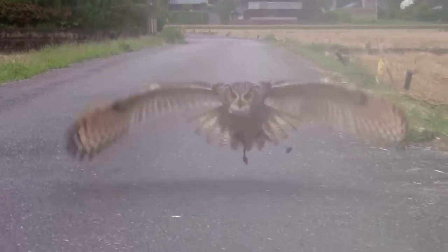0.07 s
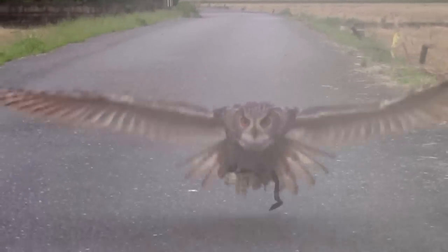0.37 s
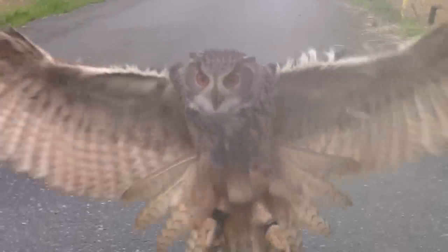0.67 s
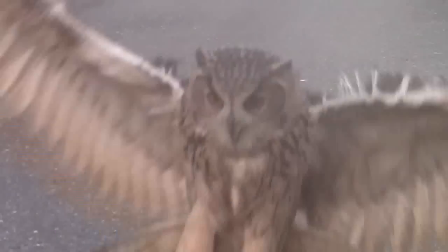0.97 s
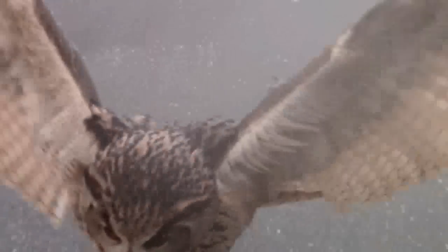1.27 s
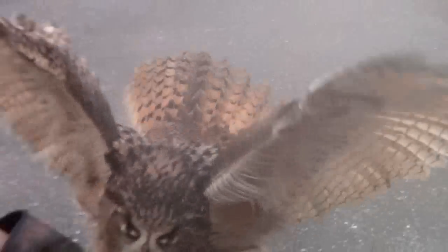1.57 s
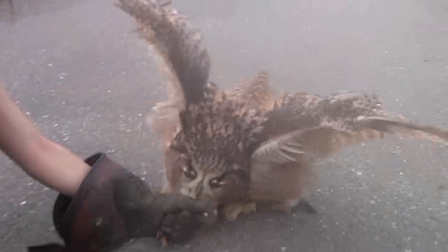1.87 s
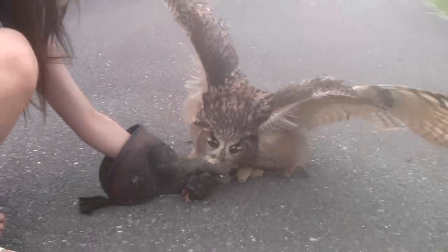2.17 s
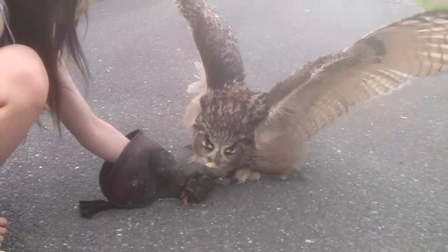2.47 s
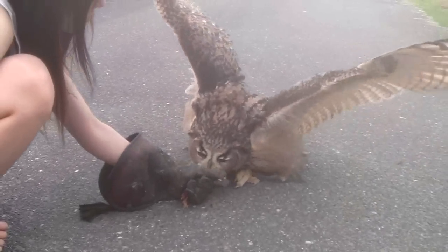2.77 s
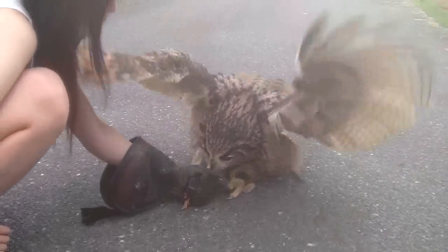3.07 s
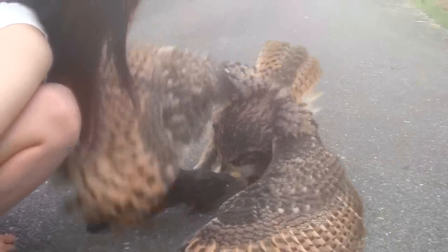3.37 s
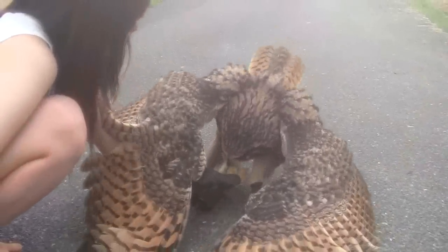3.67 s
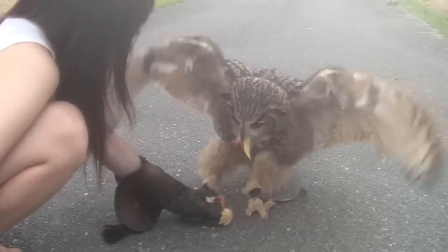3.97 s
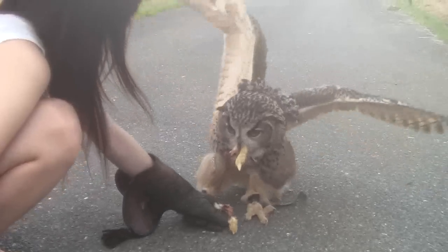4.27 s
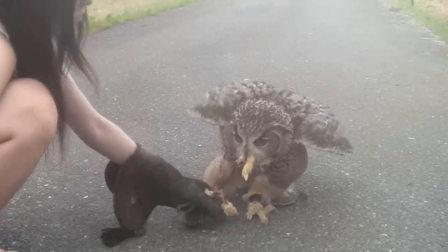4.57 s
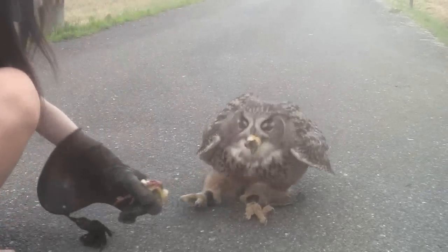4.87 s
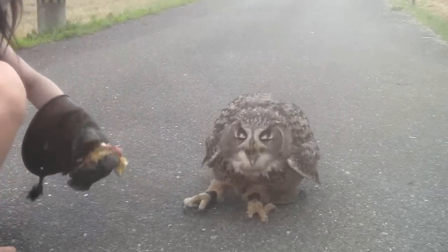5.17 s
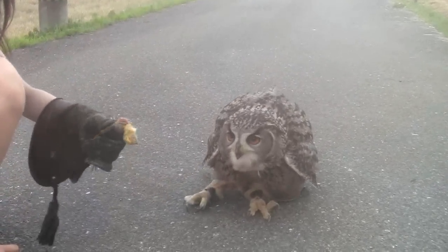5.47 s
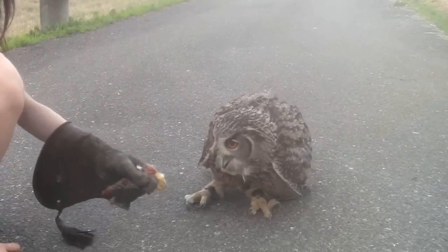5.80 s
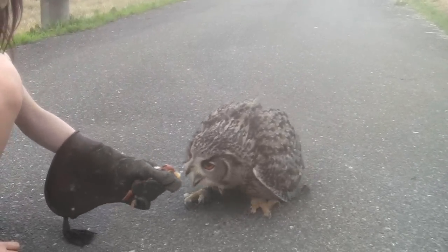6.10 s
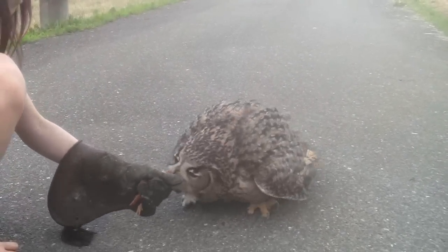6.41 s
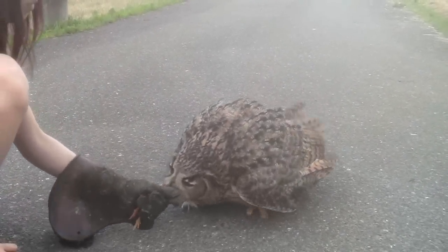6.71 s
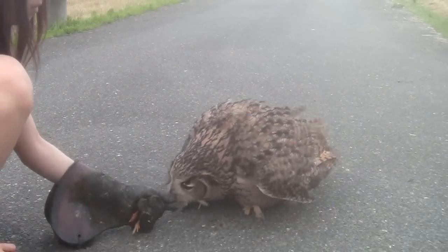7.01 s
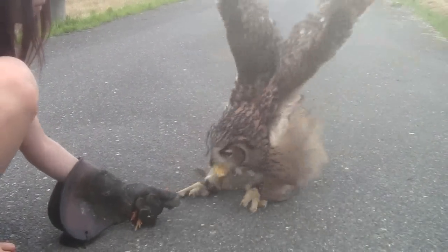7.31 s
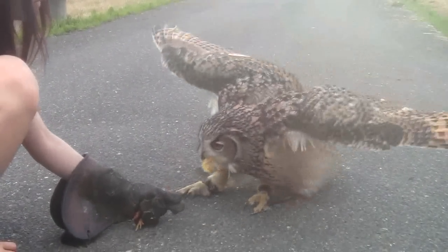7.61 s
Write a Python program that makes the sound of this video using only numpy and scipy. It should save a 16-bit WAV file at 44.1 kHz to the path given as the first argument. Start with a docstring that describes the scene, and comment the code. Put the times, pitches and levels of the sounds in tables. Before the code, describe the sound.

An owl is heard close up outdoors, over a faint, steady distant rumble and hum. It opens with a soft feather rustle, a small chirp and a dull bump. Just before 1 second the beak snaps, and a harsh, hissing scream follows, stuttering out by 1.5 seconds. A second, shorter scream comes at 2 seconds, trailed by a brief hissy echo. Soft knocks and low wing puffs continue to about 3.5 seconds. From 3 to 4 seconds the owl chitters in rapid, high, raspy downward swoops, with a cleaner run from 4.5 to 5 seconds. A third scream arrives around 5.8 seconds. Thin, wavering whines start at 6.6 seconds and mix into more chitter until about 7.6 seconds, with light rustling underneath. Single chirps, dry talon ticks and muffled handling bumps are scattered between the calls.

```python
"""An eagle owl lands on a country road and squabbles over food on a handler's glove, close by.
Feathers rustle, the beak snaps, and turbulent air rings its throat in two hissing screams,
the second trailed by a brief hissy echo. Wings push air at the microphone, then the owl's membranes
whistle runs of swooping chitter, rough when low. A third scream leads to thin whines and more chitter.
Single chirps, dull knocks and talon ticks are scattered throughout, over a distant hum."""
import sys
import numpy as np
from scipy import signal
from scipy.fft import rfft, irfft, next_fast_len
from scipy.io import wavfile
from scipy.ndimage import uniform_filter1d, map_coordinates

SR = 44100
rng = np.random.default_rng(int(sys.argv[2]) if len(sys.argv) > 2 else 0)


def wav_out(sig):
    """Save sig, one row per channel (or a flat mono array), as 16-bit PCM at SR to the path in sys.argv[1]."""
    wavfile.write(sys.argv[1], SR, np.round(np.clip(np.atleast_2d(sig).T, -1, 1) * 32767).astype(np.int16))


N = 337365

# spectrum shared by the feather rustles, the hissy echo and the beak's click: freq_hz, gain_db
DRY_HISS_COLOUR = [(500, 6), (1500, -2.5), (4000, 4.5), (6500, 2), (9000, 4.5), (11000, -5), (13000, -3)]


def screams(split_hz=6500):
    """Three harsh screams whose treble shifts with effort; the first and last break into stutters."""
    # effort curve of each scream: time_s, level_db, treble_db
    efforts = [
        [(0.99, -47, -15), (1.03, -24.5, -4), (1.102, -13.5, -9), (1.232, -13.5, -8.5), (1.318, -27, -10),
         (1.328, -17.5, -14), (1.358, -20.5, -16), (1.402, -16.5, -8), (1.435, -31, -14)],
        [(1.997, -25, -24), (2.001, -17.5, -24), (2.053, -15.5, -22), (2.079, -15, -8.5), (2.251, -14.5, -10.5),
         (2.256, -12, -4)],
        [(5.795, -30.5, -18), (5.813, -22, -11), (5.881, -13.5, -19), (5.935, -12, -15), (6.043, -18, -13),
         (6.052, -19, -10)],
    ]
    # throat resonances of each scream: centre_hz, width_hz, level_db
    throats = [
        [(554, 164, -19.5), (1966, 1160, -13.5), (2850, 780, -8.5), (3380, 580, -7), (3713, 460, 0.5),
         (4430, 600, -10.5), (5110, 1120, -7), (6700, 1100, -12.5), (8270, 1550, -16), (9170, 2300, -23),
         (10900, 2600, -29.5)],
        [(606, 560, -23), (1490, 930, -17.5), (2456, 350, -3), (3860, 1700, 2), (4620, 2100, 1.5),
         (6100, 900, -14), (8300, 3600, -14.5), (10500, 1200, -44)],
        [(593, 250, -21.5), (1480, 470, -14), (2070, 760, -2), (2810, 1160, -3.5), (4100, 970, 0.5),
         (4850, 390, -5), (6130, 2300, -7), (7900, 1800, -13.5), (9400, 2300, -15.5), (11000, 3900, -25)],
    ]
    # the opening beak slides those resonances up: start_factor, end_factor
    gapes = [(0.99, 1.09), (0.94, 1.02), (.94, 1.06)]
    # short bursts of rasp: start_s, length_s, level_db
    stutters = [(1.32, 0.011, -20), (1.451, 0.015, -26), (1.466, 0.047, -27.5), (1.49, 0.014, -17),
                (6.051, 0.026, -30.5), (6.077, 0.015, -34), (6.105, 0.0031, -25), (6.114, 0.056, -40)]
    out = np.zeros(N)
    low_pass = signal.butter(4, split_hz, fs=SR, output="sos")
    for curve, throat, gape in zip(efforts, throats, gapes):
        s, db, treble_db = np.transpose(curve)
        t = np.arange(s[0], s[-1], 1 / SR)
        breath = throat_rasp(throat, np.linspace(*gape, len(t)))
        body = signal.sosfiltfilt(low_pass, breath)
        voice = unit(body) + amp(np.interp(t, s, treble_db)) * unit(breath - body)
        add(out, s[0], voice * amp(np.interp(t, s, db)) * fade(t, 0.003))
    for s, length, db in stutters:
        t = seconds(length)
        # the throat stays as the last scream left it
        last = sum(curve[0][0] < s for curve in efforts) - 1
        held_gape = np.full(len(t), gapes[last][1])
        add(out, s, amp(db) * fade(t, 0.0025) * throat_rasp(throats[last], held_gape))
    return out


def throat_rasp(throat, gape, pulse_hz=260, depth=0.16, rough_db=0.66):
    """Turbulent air, chopped by uneven pulses, rings the throat; the gape scales every resonance."""
    size, loop_size = len(gape), 32768
    f = np.fft.rfftfreq(loop_size, 1 / SR)
    power = sum(amp(db) ** 2 / (1 + 2 * ((f - hz) / width) ** 2) ** 5 for hz, width, db in throat)
    loop = irfft(rfft(rng.standard_normal(loop_size)) * np.sqrt(power))
    ring = map_coordinates(loop, [np.cumsum(gape)], order=3, mode="wrap")  # gape sets the loop's speed
    pulse = phase_of(pulse_hz * (1 + 0.37 * walk(250, size)))
    return unit(ring * (1 + depth * np.cos(pulse)) * amp(rough_db * walk(220, size)))


def chitter(thin_db_per_octave=15.5, smooth_octaves=0.27, turn_fade_db=7.5):
    """Swoops slide to a knee, plunge to a trough and turn up; a deeper plunge thins the voice more."""
    # one swoop a row: start_s, fall_ms, top_hz, trough_hz, knee_db, trough_db, rasp (0-1)
    swoops = [(3.162, 47.5, 4720, 2170, -29, -29, 0.54), (3.25, 27, 4780, 2600, -38, -27, 0.98),
              (3.314, 28.5, 6430, 2830, -34, -23, 1), (3.395, 21, 7000, 2690, -32, -22.5, 1),
              (3.463, 29, 7630, 2600, -21, -25.5, 1), (3.541, 21, 7600, 2700, -19, -17, 0.94),
              (3.612, 24, 7760, 2730, -19.5, -19, 0.85), (3.688, 17, 4700, 2670, -23, -26.5, 0.87),
              (3.761, 19.3, 7650, 2790, -9.5, -20, 0.81), (3.838, 17, 7870, 2650, -8, -20, 0.82),
              (3.914, 23, 7960, 3030, -16, -23, .94), (3.982, 29, 7570, 2700, -16, -16.5, 1),
              (4.512, 34, 5000, 2380, -30, -30.5, 0.66), (4.597, 37, 5050, 1940, -26, -25, 0.58),
              (4.693, 32, 5100, 3440, -15, -34, 0.3), (4.785, 30.5, 5160, 3870, -23.5, -23.5, 0),
              (4.862, 42, 5150, 3290, -21.5, -23, 0.13), (6.876, 11.3, 4720, 2600, -22, -31.5, .25),
              (6.923, 38.5, 5150, 2670, -15.5, -24, 0), (6.998, 22, 4940, 3410, -14, -19.5, 0),
              (7.151, 15.4, 4410, 2440, -32, -27.5, 0.94), (7.192, 45, 6050, 2720, -22.5, -34, 0.66),
              (7.272, 32, 6260, 2700, -23, -32, 0.54), (7.343, 28, 6380, 2680, -23, -30.5, 0.83),
              (7.411, 36, 6210, 2910, -27, -27.5, 0.85), (7.491, 48, 6200, 3150, -23.5, -29.5, 0.4),
              (7.572, 43.4, 5950, 4230, -24.5, -22, 0)]
    # the manner of each bout: from_s, knee_share (of the fall), knee_ratio (to the top pitch),
    # turn_ms, end_hz, swell_db, octave_db, hiss_db, flutter (0-1)
    bouts = [(3.1, 0.51, 0.83, 27.4, 3420, 16, -12, -35, .3),
             (3.45, 0.55, 0.86, 28, 3280, 11.5, -32, -39, 0.2),
             (4.45, .55, .77, 21, 4810, 18, -12, -40.5, 1),
             (6.8, 0.73, 0.72, 23.4, 5140, 10, -15, -50, 0.4)]
    out = np.zeros(N)
    for s, fall_ms, top_hz, trough_hz, knee_db, trough_db, rasp in swoops:
        bout = [row for row in bouts if row[0] <= s][-1]
        _, knee_share, knee_ratio, turn_ms, end_hz, swell_db, octave_db, hiss_db, flutter = bout
        knee_ms, end_ms = fall_ms * knee_share, fall_ms + turn_ms
        ms = np.arange(0, end_ms, 1000 / SR)
        hz = np.interp(ms, [0, knee_ms, fall_ms, end_ms],
                       [top_hz, knee_ratio * top_hz, trough_hz, end_hz])
        excess_octaves = max(np.log2(top_hz / trough_hz) - smooth_octaves, 0)
        thin_db = (knee_db + trough_db) / 2 - thin_db_per_octave * excess_octaves
        db = np.interp(ms, [0, knee_ms, (knee_ms + fall_ms) / 2, fall_ms],
                       [knee_db - swell_db, knee_db, thin_db, trough_db])
        db -= turn_fade_db * np.clip((ms - fall_ms) / turn_ms, 0, 1)
        add(out, s, syllable(hz, db, octave_db, hiss_db, rasp, flutter))
    return out


def chirps(linger=1.5, peak_share=0.46, rise_db=9.5, fall_db=16.5):
    """Single glides that swell, fade and linger at their low end."""
    # one glide a row: start_s, length_ms, start_hz, end_hz, peak_db, octave_db, rasp (0-1)
    glides = [(0.051, 56, 3110, 2040, -34, -3.5, 0.78), (0.983, 46, 1500, 2530, -36, -11, 0.7),
              (1.616, 38.6, 2640, 1896, -20, -5.5, .5), (1.982, 17.3, 5520, 3280, -11, -32, 0),
              (2.425, 22, 2410, 1900, -31, 3.5, 0.26), (2.935, 99, 1593, 2110, -42.5, 2.5, 0.4),
              (3.012, 76, 2460, 3120, -27.5, -28, 0.76), (3.085, 68, 3460, 2900, -35.5, -20, 0.5),
              (4.061, 40, 5650, 3150, -17.5, -15, .5), (4.095, 53.6, 2394, 1712, -18.5, -7.5, 0.66),
              (4.414, 66, 1876, 2695, -26.5, -19.5, 0.55), (4.944, 33, 4900, 2500, -22.5, -0.5, 0.8),
              (4.973, 40, 2064, 1580, -17.5, -17, 0.69), (5.006, 40, 566, 380, -37, -7, .1),
              (5.41, 55, 2320, 2930, -37.5, -3, 0.67), (5.64, 95, 1710, 2700, -45.5, -9, 0.57),
              (5.752, 60, 4150, 2770, -26.5, -14, 0.54), (6.201, 50, 3240, 1780, -17.5, -16, 0.63),
              (6.495, 72, 2690, 3590, -27, -26.5, 0.35)]
    out = np.zeros(N)
    for s, ms, start_hz, end_hz, peak_db, octave_db, rasp in glides:
        along = np.linspace(0, 1, int(ms * SR / 1000))
        hz = np.interp(along, [0, 1], [start_hz ** -linger, end_hz ** -linger]) ** (-1 / linger)
        db = peak_db - np.interp(along, [0, peak_share, 1], [rise_db, 0, fall_db])
        add(out, s, syllable(hz, db, octave_db, hiss_db=peak_db - 24, rasp=rasp, flutter=0.5))
    return out


def syllable(hz, db, octave_db, hiss_db, rasp, flutter, slack_hz=3400, taut_hz=4800, release_s=0.011):
    """One whistled note, clean while high and rough when low, with its puff of hiss."""
    # spectrum of the breath: freq_hz, gain_db
    hiss_colour = [(900, -8.5), (1500, -5.5), (2000, -6), (2800, -16.5), (3800, 3.5), (5200, -12.5),
                   (6500, -4.5), (7500, 0), (9200, 0.5), (10500, -9.5), (12000, -37.5)]
    t = np.arange(len(hz)) / SR
    slack = np.interp(hz, [slack_hz, taut_hz], [1, 0.076])
    unsteady_hz = hz * (1 + 0.015 * walk(140, len(t)))
    unsteady_db = db + 2 * walk(159.8, len(t))
    note = whistle(unsteady_hz, unsteady_db, octave_db, rasp ** 2 * slack, flutter,
                   flutter_hz=601, chaos=0.15, chaos_rate=1400, croak_db=-6.5)
    hiss = amp(hiss_db + 4.3 * walk(400, len(t))) * noise(hiss_colour, len(t))
    release = np.sqrt(np.clip((t[-1] - t) / release_s, 0, 1))  # the air runs out
    return release * (fade(t, 0.00094) * note + fade(t, 0.00413) * hiss)


def whistle(hz, db, octave_db, rasp, flutter, flutter_hz=370, chaos=0.17, chaos_rate=2200,
            jitter=0.0072, croak_db=-3, sub_db=-13):
    """One membrane whistles; a second makes it flutter; when slack it goes chaotic and croaks."""
    # spectrum of the croak: freq_hz, gain_db
    croak_colour = [(1700, -33), (2250, 10), (2600, 0), (3100, -5), (3900, 9.5), (4700, -35.5)]
    size = len(hz)
    hz = uniform_filter1d(hz, size=160)
    wobble = flutter * np.sin(phase_of(flutter_hz * (1 + 0.204 * walk(150, size))))
    stray = (jitter + chaos * rasp) * walk(chaos_rate, size)
    phase = phase_of(hz * (1 + stray + 0.091 * wobble))
    throb = (1 + 0.57 * wobble) * amp(5.9 * rasp * np.tanh(walk(501, size)) - rasp)
    third = amp(-17) * (hz < SR / 8) * np.sin(3 * phase)
    overtones = amp(octave_db) * (np.sin(2 * phase) + third)
    # strong and weak cycles alternate in rough notes, which adds the octave below
    undertone = amp(sub_db) * np.sqrt(rasp + 0.05 * flutter) * (hz > 3400) * np.sin(phase / 2)
    tone = np.sqrt(2) * (np.sin(phase) + overtones + undertone)
    croak = amp(croak_db) * rasp * noise(croak_colour, size)
    return amp(db) * throb * (np.sqrt(1 - rasp ** 2) * tone + croak)


def whines(early_flutter=0.11, late_flutter=0.68):
    """The whistle held on a thin, wavering pitch, fluttering harder just before it ends."""
    # contour of each whine: time_s, pitch_hz, level_db
    contours = [
        [(6.597, 4420, -30), (6.603, 4300, -31.5), (6.619, 3767, -21), (6.633, 3640, -19.5),
         (6.665, 3930, -25.5), (6.693, 3350, -20.5), (6.703, 3420, -23.5), (6.717, 4204, -21),
         (6.751, 3840, -21), (6.789, 4220, -26.5), (6.805, 4170, -22), (6.857, 4790, -28.5), (6.879, 4380, -18)],
        [(7.032, 4170, -17.5), (7.096, 4450, -25), (7.124, 5290, -35), (7.146, 4411, -21.5), (7.154, 4420, -20)],
    ]
    out = np.zeros(N)
    for contour in contours:
        s, pitch_hz, level_db = np.transpose(contour)
        t = np.arange(s[0], s[-1], 1 / SR)
        hz = uniform_filter1d(np.interp(t, s, pitch_hz), size=400)
        db = np.interp(t, s, level_db)
        flutter = np.interp(s[-1] - t, [0.075, 0.083], [late_flutter, early_flutter])
        note = whistle(hz, db, octave_db=-25, rasp=0.0047, flutter=flutter, sub_db=-38)
        add(out, s[0], fade(t, 0.0016) * note)
    return out


def rattle(start_s=4.49, length_s=0.27, pitch_hz=1990, level_db=-41.5, throb_hz=35, throb_db=6):
    """A second voice, low and gritty, throbs under the middle run of chitter."""
    t = seconds(length_s)
    hz = pitch_hz * (1 + 0.03 * walk(60, len(t)))
    db = level_db + throb_db * np.sin(2 * np.pi * throb_hz * t + walk(28.7, len(t)))
    note = whistle(hz, db, octave_db=-3, rasp=0.43, flutter=0.39, croak_db=-7)
    out = np.zeros(N)
    add(out, start_s, fade(t, 0.01) * note)
    return out


def knocks(ring_db=-5, thud_db=2):
    """Soft bumps of wing, glove and handling: a damped ring in a dull thud."""
    # one bump a row: start_s, level_db, ring_hz
    bumps = [(0.357, -20, 554), (0.936, -21.5, 560), (1.884, -24.5, 760), (2.065, -20.5, 776),
             (2.24, -24, 740), (2.593, -24.5, 630), (2.835, -21.5, 620), (3.062, -27, 676),
             (4.167, -21, 177), (7.055, -20.5, 657), (7.314, -26, 710)]
    out = np.zeros(N)
    t = seconds(0.1)
    for s, db, hz in bumps:
        thud = amp(thud_db) * noise([(hz / 3, -9), (hz, 0), (1.6 * hz, -4), (4 * hz, -26)], len(t))
        ring = amp(ring_db) * np.sin(2 * np.pi * hz * t)
        add(out, s, amp(db) * (ring + thud) * decay(t, 0.03) * fade(t, 0.0045))
    return out


def beak_snap(start_s=0.9405, level_db=-13):
    """The beak shuts once with a click and rings briefly."""
    # modes of the beak: freq_hz, level_db, t60_s
    modes = [(1120, -1.5, 0.014), (1700, 5, 0.0087), (1940, 0.5, 0.014), (3320, -10.5, 0.01),
             (3870, -11, 0.012), (7020, -49, 0.011)]
    t = seconds(0.1)
    ring = sum(amp(db) * np.sin(2 * np.pi * hz * t) * decay(t, t60_s) for hz, db, t60_s in modes)
    click = 0.25 * noise(DRY_HISS_COLOUR, len(t)) * decay(t, 0.012)
    out = np.zeros(N)
    add(out, start_s, amp(level_db) * (ring + click) * fade(t, 0.001))
    return out


def ticks():
    """Talons and quills tap out dry, bright specks of noise."""
    # one tap a row: start_s, level_db
    taps = [(0.36, -35), (0.3895, -32.5), (0.5008, -34), (1.5573, -20.5), (1.6593, -21), (1.7257, -28),
            (1.903, -22.5), (1.944, -27), (3.5769, -14.5), (3.889, -26), (3.9026, -22), (5.072, -30.5),
            (7.2634, -17), (7.3327, -28)]
    # spectrum of a tap: freq_hz, gain_db
    tap_colour = [(1000, -11.5), (3000, -6.5), (5000, -6.5), (9000, 0), (12500, -14.5)]
    out = np.zeros(N)
    t = seconds(0.1)
    for s, db in taps:
        add(out, s, amp(db) * noise(tap_colour, len(t)) * decay(t, 0.016) / 2)
    return out


def rustles_and_echo(trim_db=-2, grain_db=3, clump_db=5.5):
    """Grainy noise plays the feather rustles, and a brief hissy echo trailing the second scream."""
    # the rustles and, at 2.22 s, the echo: start_s, length_s, level_db
    bursts = [(0.0, 0.081, -30.5), (0.64, 0.27, -45.5), (1.48, 0.15, -42), (1.6, 0.39, -54.5),
              (2.22, .15, -35.5), (2.3, 0.35, -54), (2.95, 0.26, -41.5), (3.08, 0.273, -36.5),
              (3.3, .66, -40), (3.94, .19, -34), (4.56, .46, -43), (6.58, 1.15, -38)]
    grains = unit(noise(DRY_HISS_COLOUR) * amp(grain_db * walk(450) + clump_db * walk(45)))
    return amp(trim_db) * swells(bursts, edge_s=0.049) * grains


def wing_gusts(trim_db=-2):
    """Wing strokes blow low puffs of air on the microphone."""
    # one puff a row: start_s, length_s, level_db
    puffs = [(2.24, 0.096, -41.5), (2.3, 0.51, -46), (2.97, 0.15, -38.5), (3.13, 0.086, -31.5),
             (3.18, .26, -43), (3.47, 0.099, -36.5)]
    # spectrum of a puff: freq_hz, gain_db
    puff_colour = [(25, -28), (65, 4), (160, -4), (300, -15), (900, -71)]
    return amp(trim_db) * swells(puffs, edge_s=0.025) * noise(puff_colour)


def roadside(x, t60_s=0.23, wet_db=-26):
    """A faint, short scatter from the road, verge and walls."""
    t = seconds(0.5)
    mid, side = rng.standard_normal((2, len(t))) * decay(t, t60_s) * fade(t, 0.023)
    tails = [tail / np.linalg.norm(tail) for tail in stereo(mid, side / 2)]
    return amp(wet_db) * np.array([signal.fftconvolve(x, tail)[:N] for tail in tails])


def country(rumble_db=-44, hiss_db=-55, sway_db=0.36):
    """Distant rumble and hiss, nearly the same on both sides, with a far machine's wavering hum."""
    # spectra of the open-air rumble and hiss: freq_hz, gain_db
    rumble_colour = [(15, -52), (25, -38), (35, -14), (48, -3.5), (112, -4.5), (182, -4.5), (229, -5.5),
                     (378, -9), (417, -13.5), (567, -8), (1230, -12), (1460, -12.5), (2500, -21.5),
                     (3250, -72.5), (5500, -120)]
    hiss_colour = [(1200, 6), (2200, -9.5), (3000, -1), (5000, -7.5), (8000, -12), (11000, -12.5),
                   (13000, -22.5)]
    # stereo width, as side against mid: freq_hz, gain_db
    width = [(30, -19), (70, -13), (150, -7), (300, -8), (700, -13), (2000, -13), (10000, -14)]
    # tones of the machine: pitch_hz, level_db
    hum_tones = [(64, -53), (111, -50.5)]
    mid, side = (amp(rumble_db) * noise(rumble_colour) + amp(hiss_db) * noise(hiss_colour)
                 for _ in range(2))
    hum = np.zeros(N)
    for hz, db in hum_tones:
        gain = np.sqrt(2) * amp(db + 2 * walk(5))
        hum += gain * np.sin(phase_of(hz * (1 + 0.025 * walk(5.3))))
    return hum + amp(sway_db * walk(1.7)) * stereo(mid, colour(side, width))


def amp(db):
    """Decibels to gain."""
    return 10 ** (np.asarray(db) / 20)


def unit(x):
    """Scale to rms 1."""
    return x / np.sqrt(np.mean(x ** 2) + 1e-20)


def seconds(length_s):
    """Time of each sample."""
    return np.arange(int(length_s * SR)) / SR


def phase_of(hz):
    """Running phase of a moving pitch."""
    return 2 * np.pi * np.cumsum(hz) / SR


def stereo(mid, side):
    """Mid and side to left and right."""
    return np.array([mid + side, mid - side])


def add(track, s, x):
    """Mix x into the track at time s."""
    i = max(int(s * SR), 0)
    track[i:i + len(x)] += x[:max(N - i, 0)]


def colour(x, points):
    """Filter by a spectrum of (freq_hz, gain_db) points that falls away beyond its ends."""
    hz, db = np.transpose(points)
    size = next_fast_len(len(x))
    f = np.fft.rfftfreq(size, 1 / SR) + 1e-3
    skirts = np.minimum(f / hz[0], 1) ** 2 * np.minimum(hz[-1] / f, 1) ** 10
    gain = skirts * amp(np.interp(np.log(f), np.log(hz), db))
    return irfft(rfft(x, size) * gain, size)[:len(x)]


def noise(points, size=N):
    """Coloured noise of rms 1."""
    return unit(colour(rng.standard_normal(size), points))


def walk(rate, size=N):
    """Random levels joined by lines, rate of them a second."""
    steps = rng.standard_normal(size // 8 + 2)
    return np.interp(np.arange(size) * rate / SR, np.arange(len(steps)), steps)


def fade(t, edge_s):
    """Soft start and stop."""
    return np.clip(np.minimum(t - t[0], t[-1] - t) / edge_s, 0, 1)


def decay(t, t60_s):
    """Fall by 60 dB every t60_s."""
    return np.exp(-np.log(1000) * t / t60_s)


def swells(bursts, edge_s):
    """Envelope of bursts that rise, hold and die away."""
    out = np.zeros(N)
    for s, length, db in bursts:
        add(out, s, amp(db) * fade(seconds(length), edge_s))
    return out


def scene(pan_db=0.3):
    """The owl sits almost straight ahead, a step away, in open country."""
    near = chitter() + rattle() + chirps() + whines() + screams()
    near += knocks() + beak_snap() + ticks() + rustles_and_echo() + wing_gusts()
    pan = amp(np.array([[pan_db], [-pan_db]]) / 2)
    return near * pan + roadside(near) + country()


def record(dry):
    """The microphone dulls the top octave; the recorder rounds the highest peaks and cuts the top."""
    response = [(5, -1.0), (9000, -1.0), (11000, -0.5), (13000, -14.5)]  # freq_hz, gain_db
    ceiling, top_hz = 0.9, 13000
    dull = np.array([colour(x, response) for x in dry])
    rounded = dull / (1 + (dull / ceiling) ** 6) ** (1 / 6)
    return signal.sosfilt(signal.ellip(8, 0.2, 70, top_hz, fs=SR, output="sos"), rounded)


dry = scene()
out = record(dry)
wav_out(out)
```